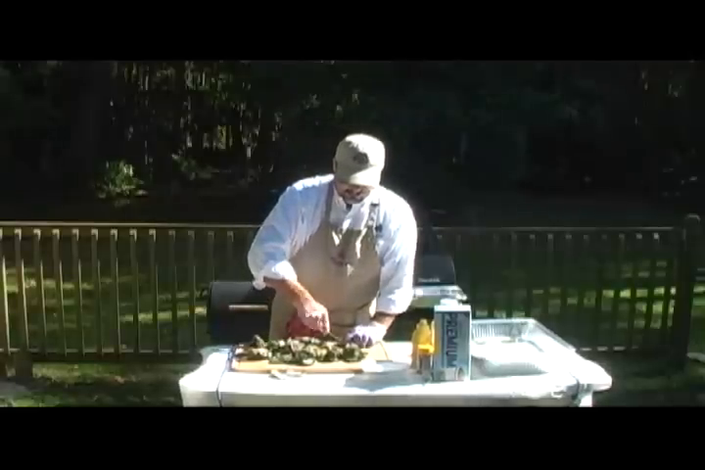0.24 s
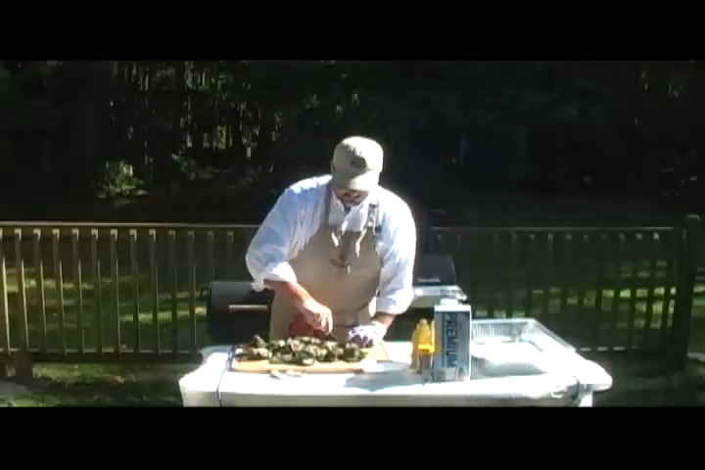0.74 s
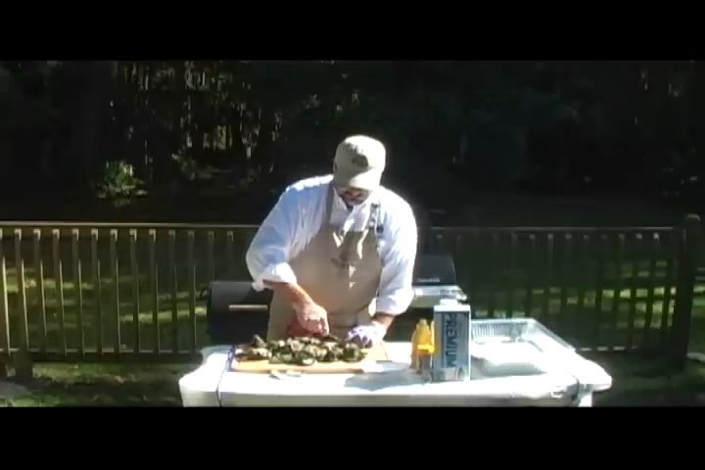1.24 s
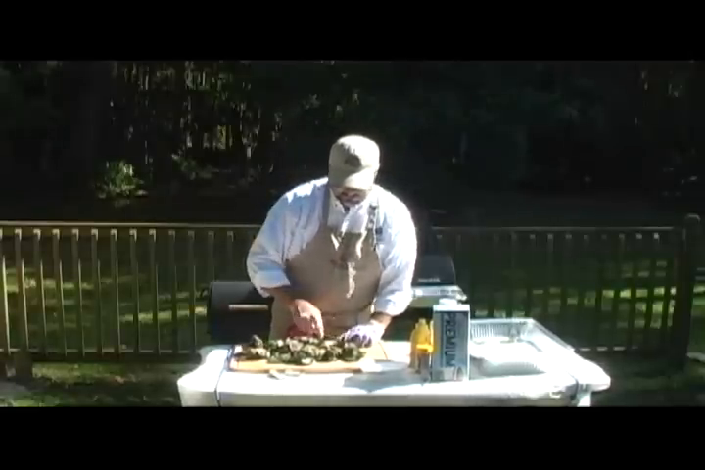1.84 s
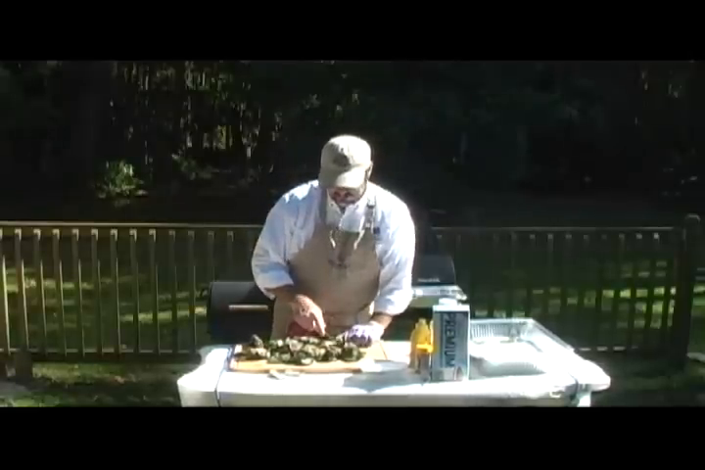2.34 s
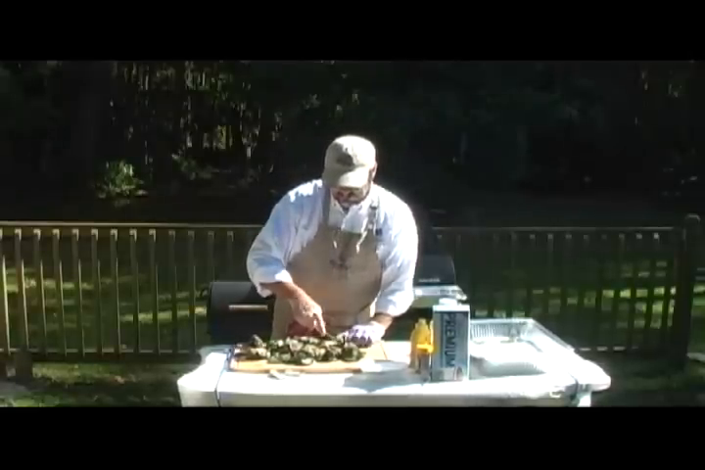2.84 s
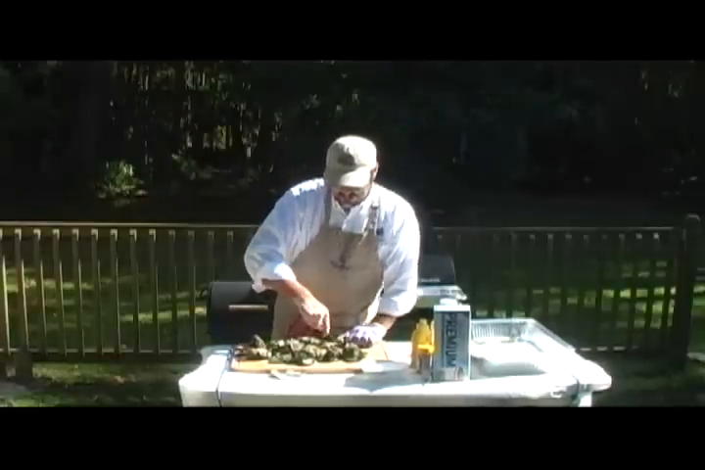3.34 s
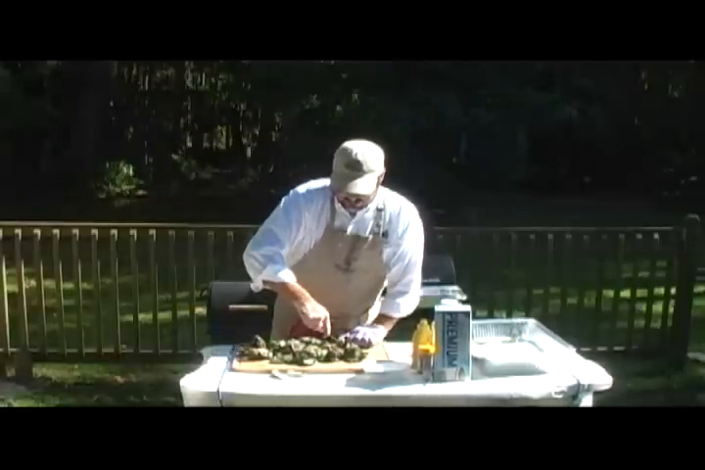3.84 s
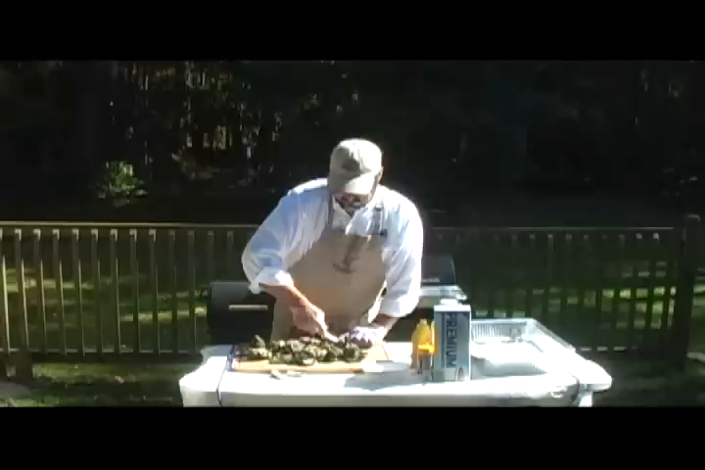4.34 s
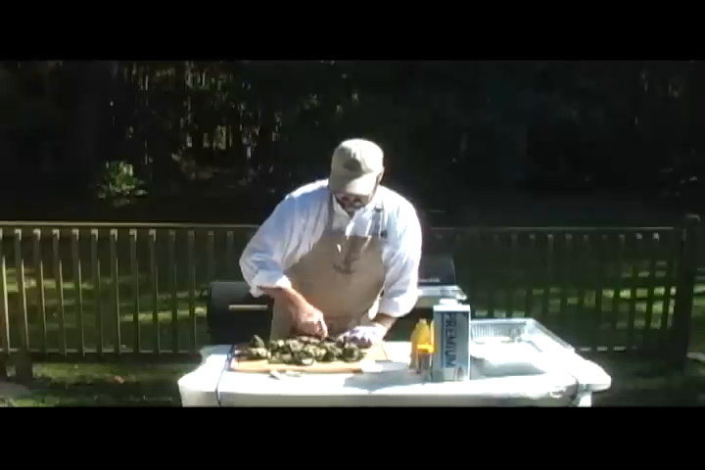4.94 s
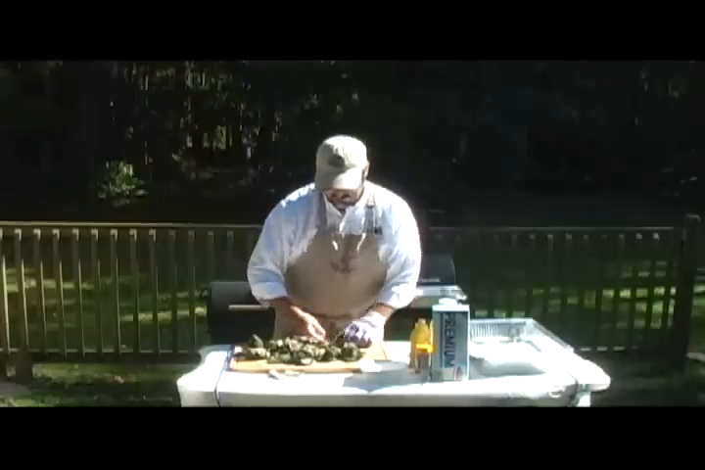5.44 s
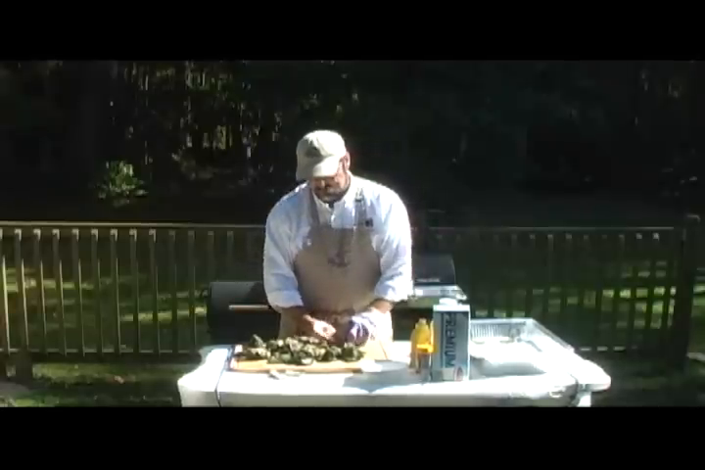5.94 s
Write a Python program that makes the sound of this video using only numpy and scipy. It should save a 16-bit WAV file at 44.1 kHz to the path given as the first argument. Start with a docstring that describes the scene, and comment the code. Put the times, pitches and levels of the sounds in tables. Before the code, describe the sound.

A quiet garden: soft leafy rush with distant traffic, a very faint high whine, and a far motor's low drone swelling at roughly 0.1-1.1, 1.5-2.1 and 2.2-3.2 seconds. Close on a table, rough shells give a dull knock, scrape and ticks from 0.1, then gritty rasps around 0.6. Fine ticks follow near 1.0 and 1.2; a thud and rasp come at 1.6-1.8, a faint rub at 2.0, a double knock near 2.5, low hollow rubs around 3.0 and a thud at 3.4. At 4.0 a shell clacks down, rocking faintly. A sharp tick and faint steel ping come at 4.5, then splintering and a loud bright crack at 4.85-4.9. Scrapes continue to 5.2; a dense flurry of clicks and thuds runs 5.3-5.7, and a hard wooden knock lands at 5.8. Short deck echoes and light tree reflections follow each blow.

```python
"""Shucking oysters at a garden table

Oyster shells scrape, tick, clack and crack, a blade pings, and a wooden board thuds. Blows and scrapes
are contact forces exciting resonances: impulses with crumbling noise, or random slips; the blade's ping
is a decaying sine. Reflections from the deck and the trees are decaying noise. Behind lie filtered noise
for a soft outdoor rush and a faint high whine, and two wavering tones for a distant motor."""
import sys
import numpy as np
from scipy import signal
from scipy.fft import rfft, irfft, next_fast_len
from scipy.io import wavfile
from scipy.ndimage import uniform_filter1d, map_coordinates

SR = 44100
rng = np.random.default_rng(int(sys.argv[2]) if len(sys.argv) > 2 else 0)


def transcribe(u):
    """Save the signal u as a 16-bit wav file named by the first command-line argument.

    u: samples, shape (n,) or (channels, n), limited to [-1, 1]; the rate is SR.
    q: integer samples, one column per channel.
    """
    v = np.clip(np.atleast_2d(u).T, -1, 1)
    q = np.round(v * 32767).astype(np.int16)
    wavfile.write(sys.argv[1], SR, q)


N = 273106
HIT = SR // 2  # samples computed for one blow or stroke

# resonances of a thin shell edge: centre_hz, width_hz, level_db
EDGE_MODES = [(2700, 52, 4.5), (3095, 59, -2), (4425, 67, 0), (4980, 30, 13), (5455, 89, 3),
              (7210, 140, 5.5), (7530, 130, -11), (7960, 420, 0.5), (8660, 74, -19)]


def amp(db):
    """Level law: decibels to amplitude gain."""
    return 10 ** (np.asarray(db) / 20)


def unit(x):
    """Energy normalization: scale to rms 1."""
    return x / np.sqrt(np.mean(x ** 2) + 1e-20)


def crest(x):
    """Short-time energy normalization: the loudest 3 ms get rms 1."""
    return x / np.sqrt(uniform_filter1d(x ** 2, size=132).max() + 1e-20)


def along(points, hz):
    """Logarithmic frequency scale: interpolate (Hz, value) points."""
    point_hz, value = np.transpose(points)
    return np.interp(np.log(hz + 1), np.log(point_hz + 1), value)


def wobble(rate, size=N):
    """Band-limited fluctuation: a smooth random curve with rate knots a second."""
    knots = rng.standard_normal(int(size * rate / SR) + 4)
    return map_coordinates(knots, [np.arange(size) * rate / SR])


def filtered(x, response):
    """Linear filtering: multiply the spectrum by a complex response of frequency."""
    n = x.shape[-1]
    padded = next_fast_len(n + SR // 4)
    spectrum = rfft(x, padded) * response(np.fft.rfftfreq(padded, 1 / SR))
    return irfft(spectrum, padded)[..., :n]


def ring(x, modes, damping=1):
    """Modal superposition: a body responds as a sum of resonators, which damping widens."""
    def response(f):
        total = 0
        for k, (centre, width, db) in enumerate(modes):
            loss = 1j * f * width * damping
            total = total + (-1) ** k * amp(db) * loss / (centre * centre - f * f + loss)
        return total
    return filtered(x, response)


def add(track, s, x):
    """Superposition: mix x into the track at time s."""
    part = track[..., max(round(s * SR), 0):][..., :x.shape[-1]]
    part += x[..., :part.shape[-1]]


def contact(crumble, t60):
    """Impulsive excitation: one push amid a decaying noise burst of crumbling flakes."""
    t = np.arange(HIT) / SR
    flakes = rng.standard_normal(HIT) * amp(-60 * t / t60) * (1 - np.exp(-t / 0.0011))
    force = crumble * flakes / np.linalg.norm(flakes)
    force[SR // 1000] += 1  # the rim crumbles for a millisecond before it bears the load
    return force


def diffuse(pair):
    """Diffuse-field coherence: two unrelated noises become alike in the bass and wide in the treble."""
    # diffuse sound at two close ports: frequency_hz, side_over_mid (ratio)
    spread = [(100, 0.17), (400, 0.49), (1500, 0.72), (6000, 0.7)]

    def mid_side_gains(hz):
        ratio = along(spread, hz)
        return np.array([np.ones(len(hz)), ratio]) / np.hypot(1, ratio)
    mid, side = filtered(pair, mid_side_gains)
    return np.array([mid + side, mid - side])


def tail(decay, delay):
    """Reverberant decay: stereo noise builds up over the delay, and each frequency dies at its own rate."""
    hz, t, z = signal.stft(diffuse(rng.standard_normal((2, HIT))), SR, nperseg=256)
    decaying = z * amp(-60 * t / along(decay, hz)[:, None])
    h = signal.istft(decaying, SR, nperseg=256)[1]
    h = h * (1 - np.exp(-(np.arange(h.shape[1]) / SR / delay) ** 2))
    return h / np.sqrt(np.sum(h ** 2) / 2)  # mean energy of the two sides is 1


def outdoors(x, deck_db, trees_db):
    """Convolution with an impulse response: direct sound, one deck echo and two reflection tails."""
    # decay of near reflections: frequency_hz, t60_s
    deck = [(150, 0.29), (700, 0.16), (1600, 0.24), (3500, 0.19), (8000, 0.15)]
    # decay of far reflections: frequency_hz, t60_s
    trees = [(150, 0.24), (1500, 0.87), (8000, 0.55)]
    bounce_s, bounce_db = 0.0065, -11.5  # the distinct echo off the deck boards
    h = amp(deck_db) * tail(deck, delay=0.0018) + amp(trees_db) * tail(trees, delay=0.026)
    h[:, 0] += 1  # direct sound
    h[:, round(bounce_s * SR)] += amp(bounce_db)
    return signal.fftconvolve(x[None], h, axes=1)


def air():
    """Shaped broadband noise: leaves and far traffic make a soft rush with slowly drifting patches."""
    # spectrum of the rush: frequency_hz, relative_density_db (per Hz)
    colour = [(20, -24), (60, -7), (145, -3.5), (175, -5.5), (283, -6.5), (450, -9), (750, -12),
              (1000, -15.5), (1270, -14.5), (1560, -19), (3000, -23), (5200, -23.5), (6200, -26.5),
              (9700, -29), (10600, -45), (22000, -120)]
    level_db = -42
    z = signal.stft(rng.standard_normal((2, N)), nperseg=512)[2]
    field = rng.standard_normal(z.shape[1:])
    field = uniform_filter1d(field, size=6, axis=0)  # patches in frequency
    field = uniform_filter1d(field, size=20, axis=1)  # patches in time
    pair = signal.istft(z * amp(1.8 * unit(field)), nperseg=512)[1][:, :N]
    rush = filtered(diffuse(pair), lambda hz: amp(along(colour, hz)))
    return amp(level_db) * unit(rush)


def drone(hz, drift_hz, waver_db):
    """Frequency and amplitude modulation: one sine wavers in pitch and level."""
    phase = 2 * np.pi * np.cumsum(hz + drift_hz * wobble(13)) / SR
    return amp(waver_db * wobble(6.8)) * unit(np.sin(phase))


def motor():
    """Tonal radiation: a far motor drones in two low tones; the lower one swells under load."""
    # spells of load on the lower tone: start_s, end_s, level_db
    loads = [(0.103, 1.062, -45.5), (1.49, 2.087, -42), (2.19, 3.244, -40)]
    ramp_s, idle_db = 0.11, -56.5  # time to swell or sink; level of the lower tone between loads
    t = np.arange(N) / SR
    load = np.zeros(N)
    for start, end, db in loads:
        load += amp(db) * np.clip(np.minimum(t - start, end - t) / ramp_s, 0, 1)
    low = np.maximum(load, amp(idle_db)) * drone(hz=103.6, drift_hz=0.86, waver_db=1.0)
    high = amp(-52.5) * drone(hz=143.2, drift_hz=2.23, waver_db=1.5)
    return low + high


def whine():
    """Narrow-band filtering of noise: two thin high tones hang in the garden air."""
    # the two bands: centre_hz, width_hz, level_db
    bands = [(5360, 40, 0), (5630, 40, -1)]
    level_db = -67.5
    return amp(level_db) * unit(ring(diffuse(rng.standard_normal((2, N))), bands))


def knocks():
    """Impact on a plate: the board's modes thud under a shell, whose rim grates a little."""
    # dull knocks: start_s, level_db (loudest 3 ms of wood), edge_db (rim over wood), contact_cutoff_hz
    blows = [(0.102, -31.5, -21, 1710), (0.542, -35.5, -9.5, 1700), (1.586, -29, -14, 1390),
             (2.46, -35, -19, 1700), (2.489, -28, -19.5, 1360), (3.384, -28.5, -18, 1200),
             (5.365, -23, -13.5, 1300), (5.477, -21.5, -13.5, 1240), (5.594, -40.5, -10, 1690),
             (5.664, -21.5, -33, 1140), (5.769, -35, -18, 1190), (5.7824, -11.5, -21, 1720)]
    # resonances of the board: centre_hz, width_hz, level_db
    board = [(154, 110, -2), (270, 100, 3), (479, 71, 7.5), (634, 212, 6.5), (724, 63, 14.5), (852, 184, 7),
             (1088, 230, 5.5), (1263, 120, 2.5), (1605, 300, -5.5), (2420, 290, -8)]
    out = np.zeros((2, N))
    for s, db, edge_db, hard_hz in blows:
        wood = ring(contact(crumble=0.28, t60=0.072), board)
        # a softer contact excites less treble
        wood = crest(filtered(wood, lambda f: 1 / (1 + 1j * f / hard_hz - (f / hard_hz) ** 2)))
        rim_modes = [(3020, 1260, 3.9), (4900, 680, 6.0), (6980, 530, 2.9)]
        rim = crest(ring(contact(crumble=4.2, t60=0.078), rim_modes))
        knock = amp(db) * (wood + amp(edge_db) * rim)
        add(out, s, outdoors(knock, deck_db=0.0, trees_db=-15.5))
    return out


def scrapes():
    """Stick-slip friction: dense uneven slips of shell on shell rasp and ring edges, cup and lip."""
    # strokes, levels as rms before the pressure curve:
    # start_s, rise_s, fall_s, grit_db, hollow_db, hollow_hz, lip_db, lip_hz
    strokes = [(0.126, 0.033, 0.05, -43.5, -44, 1360, -56, 4630),
               (0.35, 0.025, 0.07, -50, -46.5, 1370, -52, 5070),
               (0.564, 0.052, 0.063, -37.5, -38.5, 1380, -59, 4860),
               (0.63, 0.0097, 0.066, -49, -54, 1300, -42.5, 4930),
               (1.68, 0.064, 0.12, -37, -40, 1400, -44.5, 4930),
               (1.968, 0.058, 0.14, -51, -47, 2580, -58, 4400),
               (2.731, 0.037, 0.07, -63, -57, 2820, -57, 3315),
               (2.978, 0.017, 0.067, -45.5, -40.5, 2300, -39.5, 1564),
               (2.98, 0.023, 0.17, -74, -40.5, 400, -50, 1495),
               (3.272, 0.03, 0.035, -72, -39.5, 650, -66, 2600),
               (3.686, 0.017, 0.098, -42, -42, 1280, -44.5, 4160),
               (4.853, 0.042, 0.081, -38.5, -33.5, 1400, -69, 3830),
               (4.96, 0.037, 0.024, -41, -41.5, 1390, -44, 5020),
               (5.04, 0.041, 0.15, -38, -37.5, 1380, -43, 4910),
               (5.069, 0.011, 0.037, -54, -32.5, 2870, -37, 3000),
               (5.313, 0.0035, 0.11, -44, -33, 1780, -43, 2000),
               (5.34, 0.1, 0.049, -38.5, -40, 1500, -53, 5300)]
    # broad colour of breaking flakes: centre_hz, width_hz, level_db
    rasp = [(5400, 3100, -4), (8920, 680, 1)]
    # a ringing lip: multiple of lip_hz, width_hz, level_db
    lip_modes = [(1, 65, 6.5), (1.27, 69.5, -2.5), (1.9, 130, -8.5)]
    pressure_power = 0.96  # how the hand's pressure gathers toward the middle of a stroke
    catch_db, catch_rate, slip_rate = 3, 302.0, 2400  # unevenness; knots and mean slips per second
    out, t = np.zeros((2, N)), np.arange(HIT) / SR
    for s, rise, fall, grit_db, hollow_db, hollow_hz, lip_db, lip_hz in strokes:
        ramp = np.interp(t, [0, rise, rise + fall], [0, 1, 0])
        pressure = np.sin(np.pi / 2 * ramp) ** pressure_power
        catching = amp(catch_db * wobble(catch_rate, size=HIT))  # ridges catch and let go
        slips = catching * rng.standard_normal(HIT) * (rng.random(HIT) < slip_rate / SR)
        grit = unit(unit(ring(slips, rasp)) + amp(-4.5) * unit(ring(slips, EDGE_MODES)))
        hollow = unit(ring(slips, [(0.29 * hollow_hz, 550, -4), (hollow_hz, 800, 0)]))
        lip = unit(ring(slips, [(multiple * lip_hz, w, level) for multiple, w, level in lip_modes]))
        rub = amp(grit_db) * grit + amp(hollow_db) * hollow + amp(lip_db) * lip
        add(out, s, outdoors(pressure * rub, deck_db=-4.5, trees_db=-16.0))
    return out


def ticks():
    """Damped modal impact: thin shell edges click dryly and ring briefly; the cup behind sounds lower."""
    # light contacts: start_s, level_db (before a common 3.5 dB cut), click_hz, click_width_hz
    contacts = [(0.171, -33.5, 7460, 2000), (0.228, -26, 8900, 3500), (0.372, -31, 5850, 2400),
                (0.952, -40, 5200, 3470), (0.993, -42.5, 6960, 1200), (1.1902, -37, 5500, 4000),
                (1.672, -39.5, 5440, 4000), (1.7395, -35.5, 7100, 5000), (1.808, -39, 7700, 900),
                (1.8235, -45, 8800, 3000), (2.251, -31.5, 4160, 2350), (2.4602, -40.5, 4800, 700),
                (3.692, -40.5, 5300, 1200), (3.781, -38.5, 7100, 1200), (3.882, -32, 6900, 1200),
                (4.3907, -29, 4850, 1790), (4.483, -34.5, 4300, 2400), (4.5264, -23, 4230, 2000),
                (4.6737, -36.5, 6160, 2400), (5.0314, -24.5, 8600, 3500), (5.079, -28, 2930, 500),
                (5.2823, -30.5, 5630, 3500), (5.3315, -19, 5800, 2400), (5.3787, -24.5, 7260, 700),
                (5.4348, -27, 5340, 2000), (5.462, -20, 7140, 800), (5.464, -22, 3600, 2030)]
    # the cup's share at a reference tick level; its slope in dB per dB makes harder ticks brighter
    cup_db, cup_at_db, cup_slope = -0.5, -37.5, -0.46
    out = np.zeros((2, N))
    for s, db, click_hz, width_hz in contacts:
        body_db = cup_db + cup_slope * (db - cup_at_db)
        snap = crest(ring(contact(crumble=4, t60=0.008), [(click_hz, width_hz, 0)]))
        force = contact(crumble=5.2, t60=0.03)
        # each tick excites the edge modes in another balance
        modes = [(hz, w, level + rng.normal(0, 6.8)) for hz, w, level in EDGE_MODES]
        edge = crest(ring(force, modes, damping=2.3))
        cup = crest(ring(force, [(850, 280, 0.52), (1770, 620, -3.1)]))
        tick = amp(db - 3.5) * (snap + amp(-5.5) * edge + amp(body_db) * cup)
        add(out, s, outdoors(tick, deck_db=-6, trees_db=-17))
    return out


def settling(count):
    """Repeated impact: (delay s, dB) of a landing, then count evenly spaced, equally weak rocks."""
    rock_s, rock_db = 0.047, -20  # spacing and level relative to the landing
    return [(0.001, 0)] + [((k + 1) * rock_s, rock_db) for k in range(count)]


def clacks():
    """Impact of a hollow body: a shell lands on the pile with a snap, then rocks three times."""
    # landings: start_s, level_db (loudest 3 ms of the hollow sound)
    landings = [(3.996, -17)]
    # resonances of a shell on the pile: centre_hz, width_hz, level_db
    piled_shell = [(560, 140, -9), (670, 32, 5), (866, 190, 2.5), (933, 87, 6), (1066, 80, 5),
                   (1235, 82, 2.5), (1310, 86, 1), (1600, 100, -16), (1827, 67, 3), (1910, 86, 2.5),
                   (1960, 140, 3), (2450, 350, -3), (2930, 250, -5.5)]
    out = np.zeros((2, N))
    for s, db in landings:
        for delay, step_db in settling(count=3):
            cup = crest(ring(contact(crumble=0.25, t60=0.015), piled_shell))
            snap = crest(ring(contact(crumble=3.2, t60=0.0041), [(4700, 630, 20), (8000, 2700, -45)]))
            clack = amp(db + step_db) * (cup + amp(-5.5) * snap)
            add(out, s + delay, outdoors(clack, deck_db=-4.5, trees_db=-17.5))
    return out


def knife():
    """Exponential decay of a sine: the steel blade rings faintly after slipping off a shell."""
    # pings: start_s, level_db (rms at the start), pitch_hz, t60_s
    pings = [(4.525, -49.5, 2810, 0.44)]
    out, t = np.zeros((2, N)), np.arange(HIT) / SR
    for s, db, hz, t60 in pings:
        ping = amp(db - 60 * t / t60) * unit(np.sin(2 * np.pi * hz * t))
        add(out, s, outdoors(ping, deck_db=-15, trees_db=-24))
    return out


def cracks():
    """Brittle fracture: the held shell splinters, breaks with a bright crunch and thumps the table."""
    # breaks: start_s, level_db (loudest 3 ms of the shell), thump_db (table over shell)
    breaks = [(4.8487, -19.5, -10), (4.8869, -8, -18.5)]
    # resonances of a shell in the hand: centre_hz, width_hz, level_db
    held_shell = [(494, 83, -7), (880, 82, -1), (1170, 130, -3.5), (1337, 53, -1.5), (1526, 42, 3),
                  (1750, 76, 0.5), (2140, 81, -10), (2520, 430, -10.5), (3030, 95, -1.5), (3470, 62, -0.5),
                  (3765, 64, 7.5), (4560, 116, 0), (5000, 140, -6), (5500, 1100, -13), (7500, 160, -13)]
    splinter_s, splinter_db = 0.0044, -12.5  # lead of the splintering, and its level relative to the break
    out = np.zeros((2, N))
    for s, db, thump_db in breaks:
        for delay, step_db in [(-splinter_s, splinter_db), (0, 0)]:
            shell = crest(ring(contact(crumble=.2, t60=0.015), held_shell))
            crunch_modes = [(1670, 870, -1.5), (3770, 1800, -11.5), (8500, 12000, -13)]
            crunch = crest(ring(contact(crumble=4.0, t60=0.033), crunch_modes))
            table = crest(ring(contact(crumble=.2, t60=0.023), [(239.5, 18, 1.5), (297, 18, -6)]))
            crack = amp(db + step_db) * (shell + amp(-5.5) * crunch + amp(thump_db) * table)
            add(out, s + delay, outdoors(crack, deck_db=-6, trees_db=-20.0))
    return out


def scene():
    """Superposition of sources: the work on the table in front of the garden's background."""
    background = air() + motor() + whine()
    return background + knocks() + scrapes() + ticks() + clacks() + knife() + cracks()


def record(dry):
    """Two-port reception: phase and level differ by side, peaks saturate and the treble rolls off."""
    # phase between the ports: frequency_hz, left_lead_rad
    ports = [(100, -0.98), (700, -0.58), (2500, -0.66), (9000, -0.55)]
    # level between the ports: frequency_hz, left_minus_right_db
    lean = [(60, 1), (170, -4.5), (350, 0), (700, -2), (1500, -1.5), (5000, -2.5), (10000, -0.6)]
    top_hz, ceiling = 11900, .93  # nothing passes above top_hz; peaks round off toward the ceiling
    sides = np.array([[.5], [-.5]])  # each side takes half of the difference

    def port_response(hz):
        return amp(sides * along(lean, hz)) * np.exp(1j * sides * along(ports, hz))

    def treble_response(hz):
        return (hz < top_hz) * amp(along([(9500, -1.0), (10500, -8.5), (11900, -40.5)], hz))
    heard = filtered(dry, port_response)
    rounded = heard / (1 + (heard / ceiling) ** 8) ** (1 / 8)
    return filtered(rounded, treble_response)


dry = scene()
out = record(dry)
transcribe(out)
```